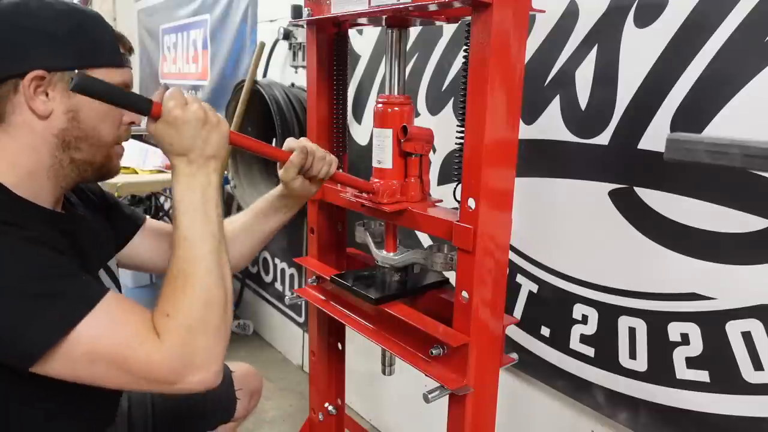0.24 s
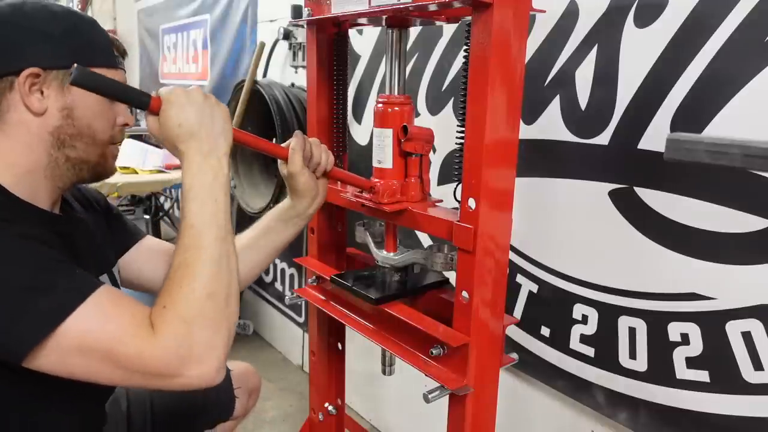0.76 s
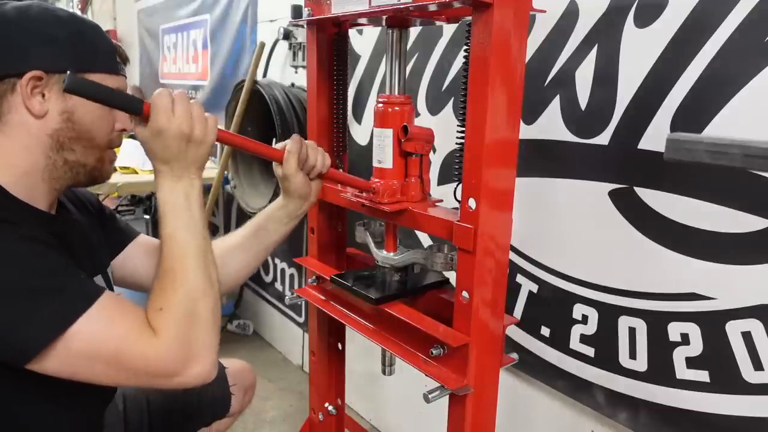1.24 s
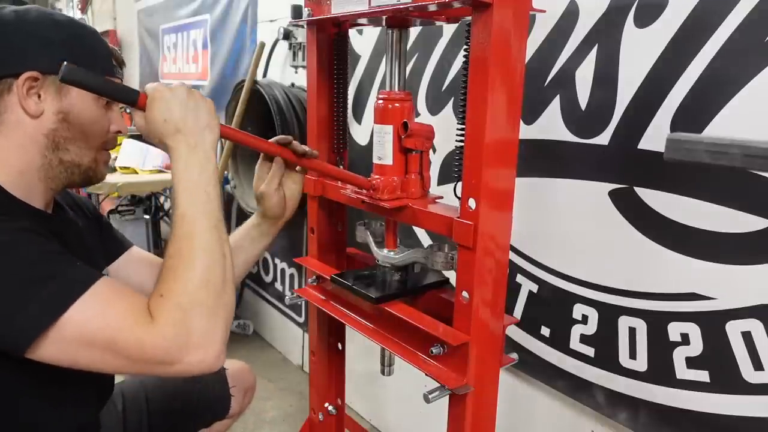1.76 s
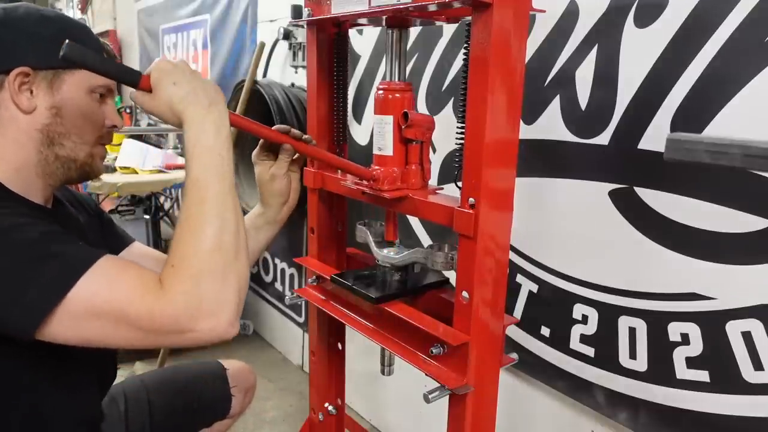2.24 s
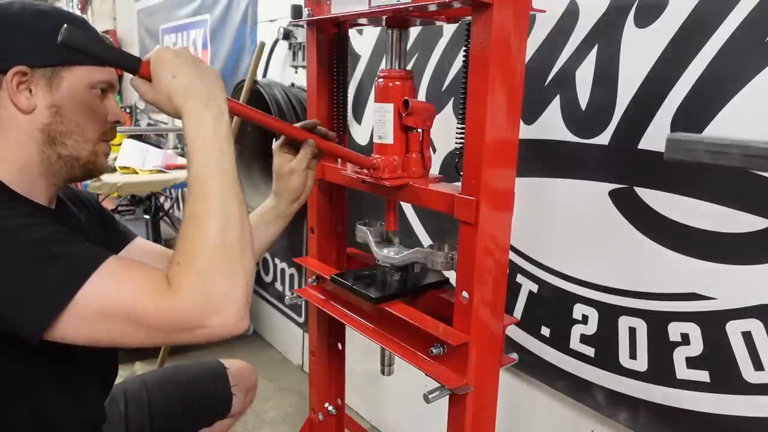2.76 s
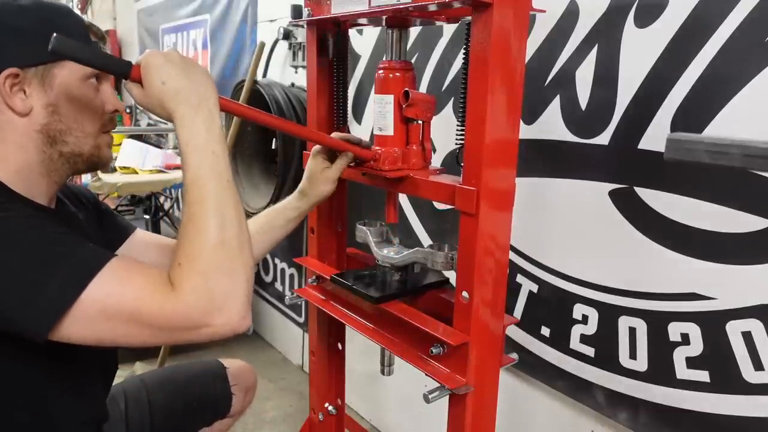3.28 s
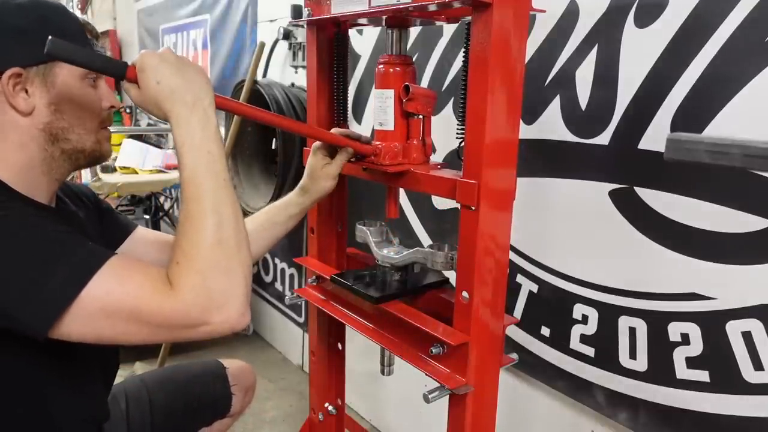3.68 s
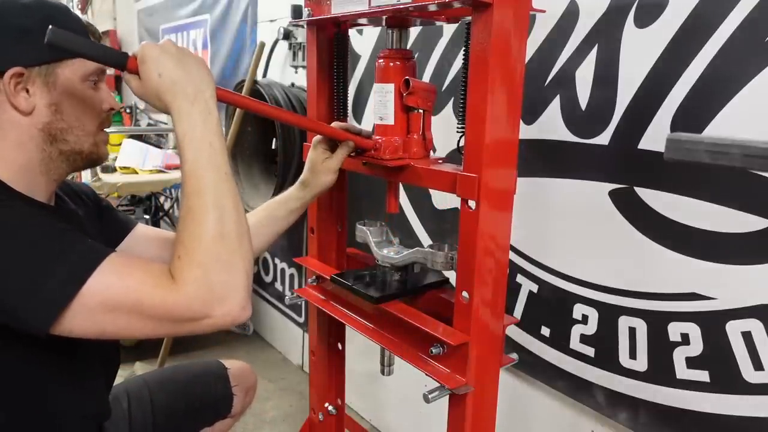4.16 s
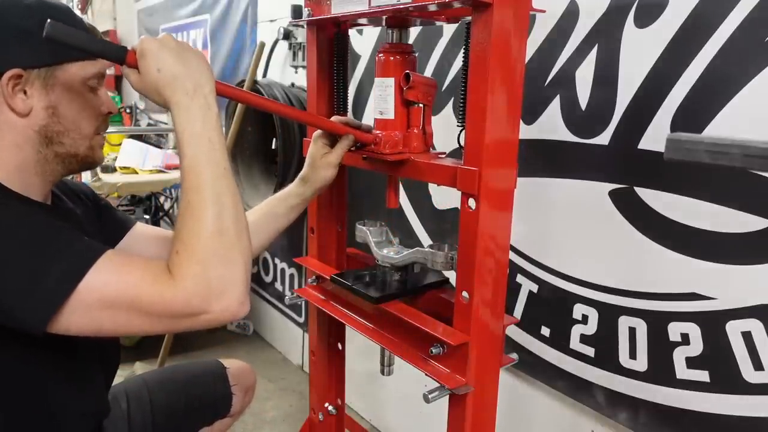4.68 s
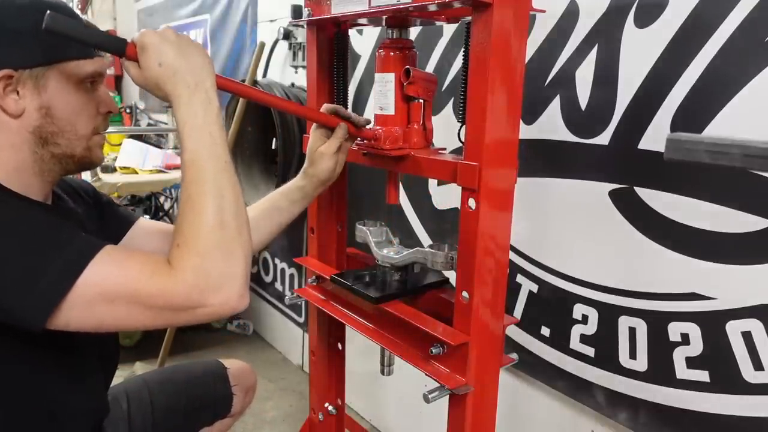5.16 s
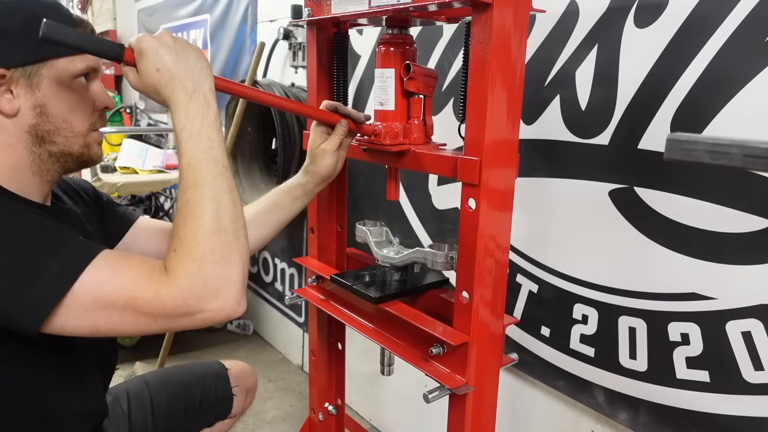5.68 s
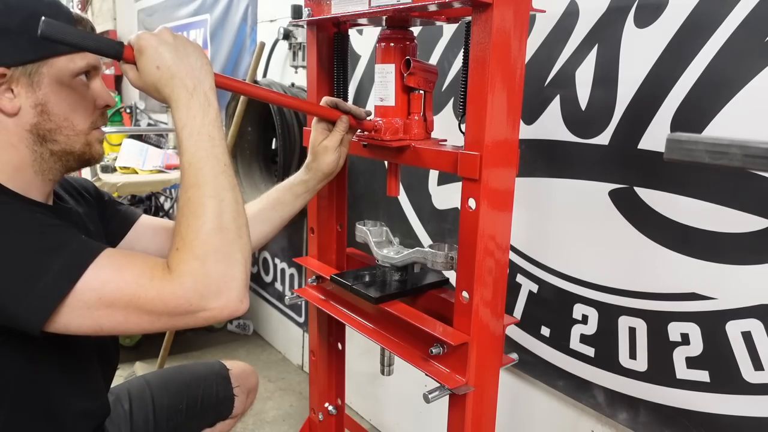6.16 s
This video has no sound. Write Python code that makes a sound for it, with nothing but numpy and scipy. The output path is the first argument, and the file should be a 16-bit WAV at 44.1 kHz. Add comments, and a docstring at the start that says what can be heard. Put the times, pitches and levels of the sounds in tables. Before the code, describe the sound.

A hydraulic press stands close, slightly right of the microphone, in an echoing workshop with a barely audible hum. From 0 to 1.9 s the metal handle knocks in scattered clicks, at the start and around 0.4, 1.05 and 1.6 s, with a tiny sagging squeak at 0.65 s. At about 2.02 s the valve catches roughly with a spurt of hissing oil, then instantly breaks into a very loud, piercing squeal around 850 Hz, rich in bright overtones. Near 2.9 s it becomes much quieter and keeps sliding down, wavering, as springs rattle the steel frame in a dense clatter until 3.55 s. A short clank and high metallic ring come around 4.4-4.6 s. The thinning squeal reaches about 380 Hz at 5.6 s with a click, then a low fluttering groan near 5.9 s, faint steel ringing, and tiny last clicks around 6.3 s.

```python
"""A hydraulic shop press in an echoing workshop, standing to the right of the microphone. Oil is let out past a
valve that chatters in a squeal: overtones of a falling pitch, shaped by the jack body, ending in a low groan.
Before it the jack handle knocks and the valve pin ticks (noise bursts through resonances), and the handle
squeaks (a rough sagging tone) on the release valve, and oil hisses (coloured noise). The return springs lift
the ram and rattle the steel frame (noise through its modes, ringing bars). A faint workshop hum lies under it
all."""
import sys
import numpy as np
from scipy import signal
from scipy.fft import rfft, irfft, next_fast_len
from scipy.io import wavfile
from scipy.ndimage import uniform_filter1d, map_coordinates

SR = 44100
rng = np.random.default_rng(int(sys.argv[2]) if len(sys.argv) > 2 else 0)


def transcribe(signal):
    """Save signal, clipped to [-1, 1], as a 16-bit WAV file at the path in sys.argv[1]."""
    frames = np.atleast_2d(signal).T
    limited = np.clip(frames, -1, 1)
    pcm = np.round(limited * 32767).astype(np.int16)
    wavfile.write(sys.argv[1], SR, pcm)


N = 283122
T = np.arange(N) / SR  # seconds
TOP_HZ = 15800  # nothing is heard above this


def amp(db):
    """Amplitude of a level in dB."""
    return 10 ** (np.asarray(db) / 20)


def unit(x):
    """x scaled to rms 1."""
    return x / np.sqrt(np.mean(x ** 2) + 1e-20)


def along(points, hz):
    """Read (Hz, value) points at hz on a log axis."""
    f, v = np.transpose(points)
    return np.interp(np.log(hz + 1), np.log(f + 1), v)


def curves(rows):
    """A gate that is open inside the table, then one value per sample for each column after the seconds."""
    s, *cols = np.transpose(rows)
    gate = uniform_filter1d(((T > s[0]) & (T < s[-1])) * 1., size=120)
    return [gate] + [np.interp(T, s, c) for c in cols]


def wobble(rate):
    """A smooth random curve, rate knots a second."""
    return map_coordinates(rng.standard_normal(int(N * rate / SR) + 4), [T * rate])


def filtered(x, response):
    """x times a complex response of frequency."""
    m = next_fast_len(N + SR)
    return irfft(rfft(x, m) * response(np.fft.rfftfreq(m, 1 / SR)), m)[..., :N]


def modes(table):
    """The causal response of (Hz, width Hz, dB) resonances, summed with alternating sign."""
    def response(f):
        return sum((-1) ** k * amp(db) * 1j * f * width / (c * c - f * f + 1j * f * width)
                   for k, (c, width, db) in enumerate(table))
    return response


def noise(spectrum, lumpy_db):
    """Coloured noise of rms 1, in uneven lumps."""
    lumps = amp(lumpy_db * wobble(150))
    return unit(filtered(rng.standard_normal(N) * lumps, lambda f: amp(along(spectrum, f))))


def workshop_hum():
    """The hum of the workshop: steady coloured noise whose level drifts slowly."""
    # Spectrum of the room. Each row: frequency in Hz, relative level in dB.
    hum_spectrum = [(24, -55.0), (40, -28.5), (217, -17.0), (410, -31.0), (569, -7.5), (640, -15.0),
                    (720, -10), (1760, -27.5), (1930, -17), (2500, -41.5), (2810, -19.5), (3090, -28.5),
                    (8490, -38.0), (11000, -37.5), (14300, -69.0), (22000, -120), (15800, -72.5)]
    hum_db = -65
    return amp(hum_db + 0.67 * wobble(3)) * noise(hum_spectrum, lumpy_db=4.0)


def knocks():
    """Each contact is a short burst of micro-impacts, strong in its own part of the handle's, valve pin's and
    frame's modes."""
    # Contacts of the handle and of the valve pin (the pin ticks at about 0.99, 1.04, 1.07, 1.53, 1.64 and 6.3
    # s). # Each row: start in seconds, relative level in dB of the 500-1700 Hz burst, then dB over it # of the
    # thud under 500 Hz, of 1.7-4 kHz, of 4-7 kHz and of the part over 7 kHz.
    contacts = [(0.0, -25.5, -4.5, -15, -11.5, -22.5), (0.038, -17, -42, -11, -22.5, -36),
                (0.41, -17, -14, -8, -18, -16), (0.414, -19.5, -10, 7, -18.5, -23),
                (0.664, -34, -7.5, -4, -9, -24), (0.993, -36.5, -14.5, -13, -6, -20),
                (1.036, -22, -15, -3, -9, -31), (1.065, -22, -11, -9, -11, -17),
                (1.53, -51, 9.5, -23.5, 19, -34), (1.558, -16.5, -27, -12, -31, -51),
                (1.64, -30.5, -6, -1.5, -13.5, -31.5), (1.861, -43, -27, -3, -35, -10),
                (5.574, -36, -5, -3.5, 11.5, 4.5), (6.297, -56.5, -12, -1.5, 10.5, -22),
                (6.346, -36.5, -3, -32, 0.5, -38)]
    # Modes of the handle, the valve pin and the frame. Each row: frequency in Hz, width in Hz, relative level
    # in dB.
    contact_modes = [(125, 12, -3.5), (213, 13, -11), (325.6, 11, -3.5), (747, 63, -13), (950, 140, -5.5),
                     (1100, 54, -7.5), (1540, 290, -9), (2040, 250, 3), (2305, 52, -3.5), (2440, 170, -1),
                     (3020, 120, -5), (3320, 190, -0.5), (4070, 63, 7.5), (4780, 150, -4.5), (5820, 180, -4),
                     (8450, 1200, -6), (10900, 3000, -21)]
    crack_t60_s, burst_t60_s = .008, .04  # the first contact and the burst that follows
    t, bands = np.arange(SR // 20) / SR, np.zeros((5, N + SR))
    for s, db, *rel_db in contacts:
        envelope = amp(-4 - 60 * t / burst_t60_s) + amp(-0.5 - 60 * t / crack_t60_s)
        burst = rng.standard_normal((5, len(t))) * envelope
        band_db = db + np.insert(rel_db, 1, 0)
        bands[:, round(s * SR):][:, :len(t)] += amp(band_db)[:, None] * burst
    edges_hz, gains_db = [60, 500, 1700, 4000, 7000, 15000], [24.7, 14.26, 6.7, 5.1, 11]
    out = 0
    for band, lo, hi, db in zip(bands, edges_hz, edges_hz[1:], gains_db):
        dense = (np.sqrt(lo * hi), hi - lo, -17)  # many small modes blur together
        out += amp(db) * filtered(band[:N], modes([m for m in contact_modes if lo < m[0] < hi] + [dense]))
    return out


def squeak():
    """Stick-slip of the valve screw as it turns: a rough sagging tone with its octave, and scraping noise."""
    # Two squeaks. Each row: start in seconds, length in seconds, starting pitch in Hz, relative level in dB.
    turns = [(.634, .034, 3050, -30.5), (0.665, .036, 2684, -34)]
    sag_hz_per_s, fade_db_per_s, rise_s = 3300, 27, .012
    scrape = noise([(300, -62), (2000, -13.0), (3500, -5.5), (5500, -5.5), (8000, -15), (14000, -32)],
                   lumpy_db=-1.5)
    slip, size = 0.02 * wobble(540), amp(5.5 * wobble(300))  # uneven pitch and strength
    out = 0
    for s, length, start_hz, start_db in turns:
        end = (s + length, start_hz - sag_hz_per_s * length, start_db - fade_db_per_s * length)
        gate, hz, db = curves([(s, start_hz, start_db), end])
        phase = 2 * np.pi * np.cumsum(hz * (1 + slip)) / SR
        tone = size * (np.sin(phase) + 0.39 * np.sin(2 * phase))
        rise = np.clip((T - s) / rise_s, 0, 1)
        out += gate * rise * amp(db) * (0.98 * tone + 0.54 * scrape)
    return out


def oil():
    """Oil forced past the valve seat: a rush and a thin hiss, both wavering."""
    # Flow of the oil. Each row: time in seconds, relative level of the rush in dB, of the hiss in dB.
    flow = [(1.52, -66, -78), (1.638, -67, -54), (1.83, -78.5, -50.5), (2.012, -62.5, -58),
            (2.027, -46, -14.5), (2.085, -35.5, -22), (2.105, -40.5, -36), (2.4, -43.5, -35),
            (2.68, -42, -48), (3.8, -48.5, -55), (4.35, -46.5, -50), (4.88, -50.5, -71), (5.01, -45.5, -43),
            (5.16, -47, -43), (5.22, -55.5, -54), (5.36, -49, -44), (5.57, -45, -48.5), (5.66, -57, -55),
            (5.85, -59.5, -54), (5.96, -58, -94), (6.02, -68.5, -92), (6.2, -89, -95)]
    # Spectra of the rush and of the hiss. Each row: frequency in Hz, relative level in dB.
    rush_spectrum = [(100, -51.5), (500, -18.5), (800, -2), (1500, -10.5), (2500, -9), (3700, -7.5),
                     (4700, -0.5), (6000, -6.5), (9000, -14), (13000, -52.5), (16000, -58)]
    hiss_spectrum = [(1000, -68), (3000, -35), (5000, -25), (7000, -10.5), (8800, 2.5), (11000, -1),
                     (13000, -2.5), (15800, -37)]
    rush, hiss = noise(rush_spectrum, lumpy_db=1.0), noise(hiss_spectrum, lumpy_db=3.0)
    gate, rush_db, hiss_db = curves(flow)
    rush_level = amp(rush_db + 7.5 + 1.1 * wobble(15))
    hiss_level = amp(hiss_db - 5.5 + 2.0 * wobble(17))
    return gate * (rush_level * rush + hiss_level * hiss)


def squeal(table, jitter):
    """The valve ball shuts once a cycle; each overtone swells as it slides through the body's fine resonances."""
    # Broad colour of the jack body. Each row: frequency in Hz, relative level in dB.
    body_colour = [(600, 18), (1000, 3.5), (1500, -10.5), (2400, -9), (3000, -9.5), (3600, -10.5),
                   (4150, 1.5), (4700, -1), (5700, -2), (7400, -8), (8600, -2), (11500, -30),
                   (13500, -23.5), (15800, -21)]
    # Fine resonances of the body. Each row: frequency in Hz, width in Hz, relative level in dB.
    swells = [(1170, 31, 1.5), (1602, 40, -4), (2439, 21, -10), (2870, 120, -20), (3292, 49, -8),
              (3950, 36, -6.5), (4103, 50, 1), (4560, 76, -13.5), (4926, 140, -8.5), (5750, 35, -0.5),
              (5620, 41, -6.5), (5944, 34, 0), (6540, 30, -5), (7300, 31, -16), (8360, 33, -29),
              (8600, 49, -16), (9100, 46, -8.5), (8880, 24, -6.5), (9810, 68, -16), (9800, 27, -18),
              (10300, 17, -14), (10600, 37, -0.5), (11100, 42, -14), (11450, 82, -11.5), (12000, 44, -20.5),
              (12300, 51, -20), (12500, 110, -11), (12800, 28, -28)]
    # How overtones follow the force: under 3 kHz, from 4.8 to 7.5 kHz and above.
    # Each row: relative level in dB at middling force, dB gained per dB of force.
    follow = [(-44, 1.59), (-45, 1.3559), (-52.5, 1.62)]
    middling_db = -40
    full_hz, sharp_db_per_hz = 809.5, 0.18  # sharper closures at the highest pressure lift the top overtones
    rumble_db, rumble_grows = -43, 1.3  # a low rumble rides under the squeal, growing faster than the fundamental

    gate, hz, first_db, force_db, near4k_db = curves(table)
    low, high, top = [db + grows * (force_db - middling_db) for db, grows in follow]
    range_db = low, near4k_db, high, top + sharp_db_per_hz * np.maximum(hz - full_hz, 0)
    on = gate > 0
    slack = (850 / hz) ** 2.1  # the weaker the pressure, the less even the closures
    uneven_hz = hz * (1 + jitter * slack * wobble(90) + 0.000833 * wobble(12))
    phase = (2 * np.pi * np.cumsum(uneven_hz) / SR)[on]
    out = amp(first_db + 1.4 * wobble(24.68))[on] * np.sin(phase)
    for k in range(2, 36):
        f = k * hz[on]
        # crossfade between the four ranges
        share = [np.clip((f - edge) / 200, 0, 1) for edge in (0, 2900, 4700, 7400, TOP_HZ)]
        db = sum((a - b) * c[on] for a, b, c in zip(share, share[1:], range_db))
        swell_power = sum(amp(2 * g) / (1 + (2 * (f - c) / width) ** 2)
                          for c, width, g in swells if abs(c - f).min() < 6 * width)
        body = np.sqrt(amp(2 * along(body_colour, f) - 15.5) + swell_power)
        level = body * amp(db + 4.5 + 4.7 * wobble(18)[on]) * (f < TOP_HZ)
        out += level * np.sin(k * phase + k * k)
    # every second closure is weaker, by a wavering amount: a line halfway between the first two
    out += amp(first_db - 33 + 4 * wobble(8))[on] * np.sin(1.5 * phase)
    sound = np.zeros(N)
    sound[on] = np.sqrt(2) * gate[on] * out
    rumble = noise([(25, 3), (130, 6), (300, -1), (500, -41), (900, -120)], lumpy_db=6)
    return sound + gate * amp(rumble_grows * first_db + rumble_db) * rumble


def rattle():
    """Dense coil impacts drive the frame's modes; slips restart them; one thin part sings near 8 kHz."""
    # Springs scraping and shaking the frame. Each row: start in seconds, let-go in seconds, level in dB,
    # fade while held in dB/s, relative level of the low bars in dB, of the bed plate at the start in dB.
    shakes = [(2.887, 3.563, -25.5, -1.5, -5, -36), (4.391, 4.556, -21.5, 22, -8, -34.5)]
    # Coil slips. Each row: time in seconds, relative level in dB, pitch in Hz of the bar that rings,
    # its starting level in dB.
    slips = [(2.822, 3.5, 1850, -19.5), (2.8904, -5.5, 1540, -16), (2.9784, -5.5, 1860, -16.5),
             (3.021, -16, 1850, -26.5), (3.2013, -6.5, 1860, -24.5), (3.2594, -10, 1380, -21),
             (3.3508, -3.5, 1380, -25), (3.4089, -6.5, 1860, -28), (3.474, -3, 1380, -17.5),
             (3.544, -7.5, 1230, -19.5), (4.3909, -7.5, 1840, -30)]
    # Modes of the frame, the bed plate first. Each row: frequency in Hz, width in Hz, relative level in dB.
    frame_modes = [(338, 32, -18.5), (702, 150, -1.5), (1150, 18, 4.5), (1413, 4, 1), (1566, 54, 3.5),
                   (1870, 78, 0.5), (2423, 50, 2), (2810, 14, 0), (3330, 140, 2), (4003, 59, -3.5),
                   (4070, 38, -6), (4950, 60, -7.5), (5230, 28, 1.5), (5876, 40, -6.5), (6270, 22, -1.5),
                   (6560, 47, -8), (6955, 380, -9), (6940, 32, -10.5), (7235, 180, -10.5),
                   (7650, 76, -11.5), (8220, 19, 0)]
    # Broad colour of the clatter. Each row: frequency in Hz, relative level in dB.
    clatter = [(530, -47.5), (900, -13.5), (1680, -2.5), (1870, -9.5), (2240, -7), (4880, -3.5),
               (7880, -16), (8570, -9), (8890, -8), (15800, -42.5)]
    # A thin part set singing. Each row: loudest moment in seconds, level in dB, rise and fall in dB/s.
    sings = [(2.95, -34.5, 120.5), (3.29, -26, 64.5), (4.557, -25.5, 154.5)]
    dying_db_per_s, boom_grows_db_per_s = 124.5, 19.5  # after the let-go; bed plate while held
    mid_db, bright_db = -1.5, -9.5
    jolt_t60_s, bar_t60_s = 0.23, 0.24

    def frame(f):
        return amp(along(clatter, f) - 6) + modes(frame_modes[1:])(f) * (f / (f + 900)) ** 2

    shake = 2.52 * wobble(350) + 1.8 * wobble(25)

    def impacts(lo, hi):
        """One band of the frame, with its own unevenness: different coils and bars take turns."""
        hits = rng.standard_normal(N) * amp(shake + 1.1 * wobble(70))
        return unit(filtered(hits, lambda f: frame(f) / (1 + (f / hi) ** 6) / (1 + (lo / (f + 1)) ** 6)))

    edges_hz = [600, 1650, 4150, 8000, 16000]
    low, body, mid, bright = [impacts(lo, hi) for lo, hi in zip(edges_hz, edges_hz[1:])]
    sing = unit(filtered(rng.standard_normal(N), modes([(8400, 27, -1.5), (8330, 4.5, 0)])))
    bed_plate = modes([(125, 25, -15), frame_modes[0][:2] + (0,)])
    boom = unit(filtered(rng.standard_normal(N), bed_plate))
    out = sing * sum(amp(db - slope * np.abs(T - s)) for s, db, slope in sings)
    for s, let_go, db, fade, low_db, boom_db in shakes:
        held = np.clip(T, s, let_go) - s
        level = (T > s) * amp(db - fade * held - dying_db_per_s * np.maximum(T - let_go, 0))
        bars = body + amp(low_db) * low + amp(mid_db) * mid + amp(bright_db) * bright
        out += level * (bars + amp(boom_db + boom_grows_db_per_s * held) * boom)
    jolt, ringing = 0, 0
    for s, db, bar_hz, bar_db in slips:
        since = np.abs(T - s)
        jolt += amp(db - 20 - 60 * since / jolt_t60_s) * (T > s)
        ringing += amp(bar_db - 60 * since / bar_t60_s) * (T > s) * np.sin(2 * np.pi * bar_hz * (T - s))
    jolted = jolt * (0.54 * low + body + .4 * mid + 0.09 * bright)
    return out + ringing * amp(3.3 * wobble(60)) + jolted


def groan():
    """At low pressure the valve flutters slowly; its closures ring the ram."""
    # Flutter of the valve. Each row: time in seconds, pitch in Hz, level of the tone in dB,
    # relative level of the buzz in dB.
    flutter = [(5.7, 214, -69, -55), (5.77, 222, -58, -63), (5.792, 223, -75, -62), (5.82, 214, -59, -62),
               (5.918, 205.4, -50, -31.5), (5.95, 209, -62.5, -40.5), (6.12, 208, -96, -56)]
    # The ram's steel. Each row: frequency in Hz, relative level in dB, t60 in seconds.
    ram_steel = [(1600, -7, 0.97), (1960, -6, 1.8), (2230, -21, 0.55), (2800, 1.5, 0.81), (2869, 3.5, 1.1),
                 (3210, -1, 0.43), (3330, 0, 0.41), (4730, 0, 0.4), (5852, -23, .4), (7360, -10.5, 0.3)]
    gate, hz, tone_db, buzz_db = curves(flutter)
    cycles = np.cumsum(hz * (1 + 0.018 * wobble(40))) / SR
    closures = np.diff(np.floor(cycles), prepend=0) * amp(3.1 * wobble(200))  # one pulse a cycle
    taps = closures + .05 * rng.standard_normal(N)
    rings = [(c, np.log(1000) / np.pi / t60, db - 20 * np.log10(1 / t60)) for c, db, t60 in ram_steel]
    steel = modes(rings + [(4140, 1500, -41.5)])
    scale = np.std(filtered(taps, steel))
    tone = np.sin(2 * np.pi * cycles) + 0.16 * np.sin(4 * np.pi * cycles)
    buzz = filtered(gate * amp(buzz_db - 10.0) * taps, steel) / scale
    return np.sqrt(2) * gate * amp(tone_db) * tone + buzz


def shop(x, alike):
    """Echo of the workshop: noise in which each frequency dies at its own speed, mostly alike in both channels."""
    # Decay of the room. Each row: frequency in Hz, t60 in seconds.
    decay = [(100, 0.82), (260, 0.68), (700, 0.91), (1840, 0.52), (4850, 0.52), (12800, 0.31)]
    hz, t, z = signal.stft(rng.standard_normal((2, SR)), SR, nperseg=256)
    mid, side = signal.istft(z * amp(-60 * t / along(decay, hz)[:, None]), SR, nperseg=256)[1]
    side = np.diff(side, prepend=0) * (1 - alike)  # the channels differ most in the treble
    tail = np.array([mid + side, mid - side]) / np.linalg.norm(mid)
    delayed = np.pad(x, (300, 0))  # samples before the echo starts
    return signal.fftconvolve(delayed[None], tail, axes=1)[:, :N]


def scene():
    """All sources near the microphone, plus the echo each sends into the workshop."""
    # Valve chatter. Each row: time in seconds, pitch in Hz, relative level of the fundamental in dB,
    # force of the closures in dB, relative level of the overtones near 4 kHz in dB.
    chatter = [(2.07, 855, -79.5, -62.5, -56.5), (2.09, 848, -16.5, -30, -37), (2.19, 862, -13.5, -31, -43),
               (2.3, 834.7, -13, -29, -36), (2.44, 825.6, -12.5, -26.5, -42.5),
               (2.53, 814.2, -14.5, -32, -36), (2.66, 818.6, -12, -32, -37), (2.76, 785.3, -17, -30.5, -33),
               (2.87, 776.3, -20.5, -32, -40), (2.91, 772, -29, -35, -36.5),
               (3.02, 773.6, -31.5, -44.5, -45), (3.12, 736, -24.5, -46, -33.5),
               (3.28, 724.4, -27, -50, -51), (3.4, 701, -41.5, -39.5, -47.5), (3.66, 636, -31, -46.5, -47),
               (3.79, 618.2, -50.5, -41, -41), (3.955, 600.2, -40, -44.5, -38.5),
               (4.125, 582.2, -52, -41, -33), (4.3, 562.3, -41, -40, -32), (4.47, 542.5, -54.5, -44, -30),
               (4.63, 522, -45, -46, -29.5), (4.72, 519.4, -57, -56, -33.5), (4.89, 488.8, -44.5, -41, -42),
               (5.07, 442, -42, -39, -38), (5.16, 429.5, -53.5, -42, -36.5), (5.4, 406.1, -38.5, -43, -43),
               (5.585, 376, -35, -41.5, -43.5), (5.62, 381, -74, -66, -65)]
    # A rough lower note as the valve cracks open. Each row: time in seconds, pitch in Hz, then in dB
    # the fundamental, the force of the closures and the overtones near 4 kHz.
    catch = [(2.018, 645, -59.5, -50.5, -48.5), (2.027, 654, -51.5, -32.5, -31),
             (2.07, 639, -31, -40, -42.5), (2.097, 644, -53, -41.5, -43.5)]
    hum, blows, screw = workshop_hum(), knocks(), squeak()
    valve = squeal(catch, jitter=0.0041) + squeal(chatter, jitter=.0015) + groan()
    steel = rattle() + oil()
    wet = amp(-11.0) * valve + amp(-5.5) * steel + amp(-1.5) * blows + amp(-9.0) * screw + amp(-4.5) * hum
    return valve + steel + blows + screw + hum + shop(wet, alike=0.4)


def record(dry):
    """The press stands to the right; the microphone bends loud peaks a little unevenly and is deaf to deep bass."""
    # Balance of the two channels. Each row: frequency in Hz, left minus right in dB.
    lean = [(100, 1), (350, 0), (700, -2.5), (1300, -2.5), (2400, -2.5), (4400, -2), (8100, -5), (15000, 2)]
    bent = (dry + .012 * dry ** 2) / (1 + np.abs(dry / 0.69) ** 4) ** (1 / 4)

    def microphone(hz):
        sides = amp(np.outer([.5, -.5], along(lean, hz)))
        return sides * (hz < TOP_HZ) / (1 + (80 / (hz + 1)) ** 2)

    return filtered(bent, microphone)


dry = scene()
out = record(dry)
transcribe(out)
```